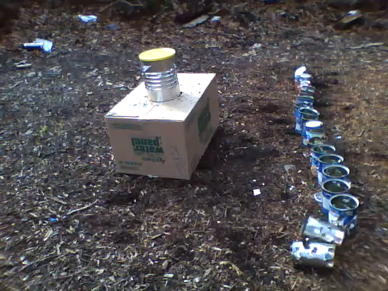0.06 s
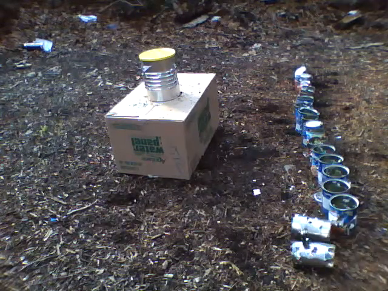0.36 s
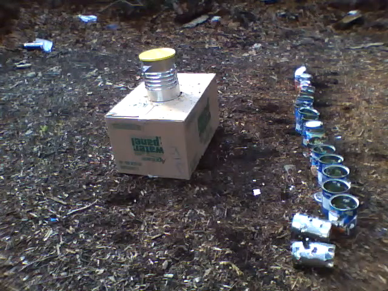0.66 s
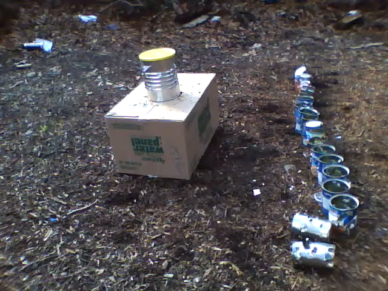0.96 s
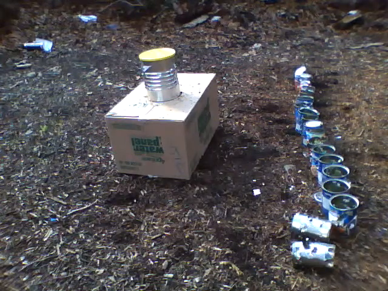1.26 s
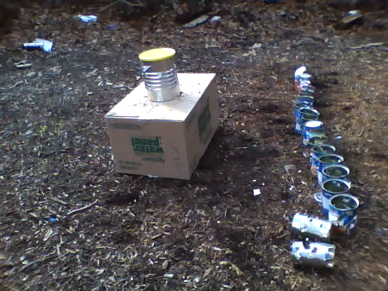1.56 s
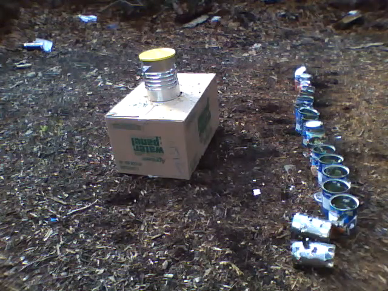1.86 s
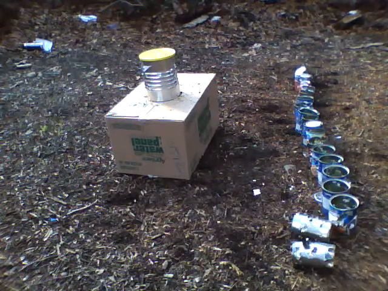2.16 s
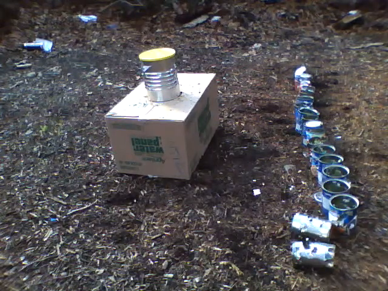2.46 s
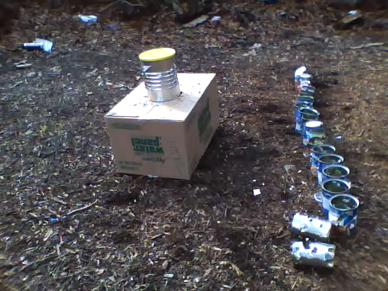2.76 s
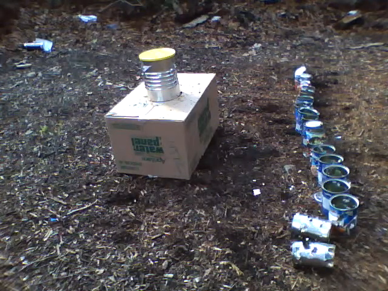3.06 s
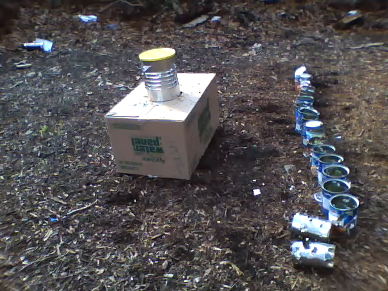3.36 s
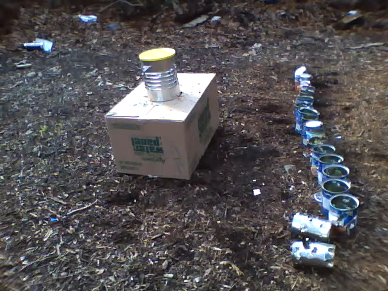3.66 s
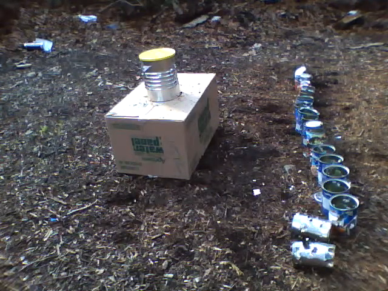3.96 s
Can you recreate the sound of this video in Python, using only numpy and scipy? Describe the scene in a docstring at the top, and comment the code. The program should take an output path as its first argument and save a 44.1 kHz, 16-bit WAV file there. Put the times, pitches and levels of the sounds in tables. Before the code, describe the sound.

A tin can rings and clatters right at the start, knocking hard on another can while the echo of a blow fades among trees. It scuffs over dry leaves and settles with small ticks by about 0.7 seconds. Faint outdoor air, microphone hiss and distant rumble carry on throughout. Near 2.8 seconds a metal catch snaps with one light double click and a short echo.

```python
"""A tin can, struck a moment earlier, tumbles off a row of cans onto leaf litter among trees.
At first its modes ring while the blow dies away in the wood, over faint outdoor air, microphone hiss,
hum and distant rumble that last throughout. It ticks, knocks hard on a neighbour, then scuffs the
ground and settles with more small ticks as the litter shifts. Near 2.8 s a metal catch snaps over
with one light double click, which echoes off the trees."""
import sys
import numpy as np
from scipy import signal
from scipy.fft import rfft, irfft
from scipy.io import wavfile

SR = 44100
rng = np.random.default_rng(int(sys.argv[2]) if len(sys.argv) > 2 else 0)


def transcribe(signal):
    """Save signal, clipped to [-1, 1], as a 16-bit WAV file at the path in sys.argv[1]."""
    frames = np.atleast_2d(signal).T
    limited = np.clip(frames, -1, 1)
    pcm = np.round(limited * 32767).astype(np.int16)
    wavfile.write(sys.argv[1], SR, pcm)


N = 176400
T = np.arange(N) / SR

# modes that the first blow left ringing in the can: pitch_hz, level_db, t60_s
CAN_MODES = [(791, -37.5, .75), (838, -51, .8), (1077, -35.5, .25), (1125, -48, .55), (1453, -39, .14),
             (1620, -41, .3), (2005, -38, .22), (2557, -40, .14), (3585, -39, .1)]
# reverberation of that blow among the trees: frequency_hz, density_db, t60_s
BLOW_REVERB = [(40, -42, .8), (150, -29, 0.62), (533, -31, 0.67), (1340, -23.5, 0.9), (3100, -25.5, 0.64),
               (5050, -32, 0.66), (7000, -35, 0.44), (9900, -41, 0.34), (15500, -45, 0.27)]
# spectral shape of outdoor air and microphone hiss: frequency_hz, relative_density_db
AIR_SPECTRUM = [(15, -44), (25, -8), (53, -2.5), (107, -3.5), (198, -3), (227, -5.5), (253, -4.5),
                (289, -6), (399, -4), (762, -2.5), (1170, -8.5), (1340, -12.5), (3440, -18), (12200, -18),
                (15500, -21)]
# faint hum and electrical whine: centre_hz, level_db, width_hz
HUM_BANDS = [(103, -72, 10), (11950, -81, 16)]
# envelope of the distant rumble: time_s, level_db
RUMBLE_LEVELS = [(0, -69), (1.1, -76), (1.7, -61.5), (2.6, -69), (3.3, -62), (4.1, -66)]
# small contacts with cans, twigs and grit: start_s, level_db, centre_hz, t60_s
TICK_CONTACTS = [(.003, -34, 1330, 0.096), (0.0336, -27, 3440, 0.0089), (0.0816, -21, 2750, 0.0036),
                 (0.0936, -32, 5640, 0.0055), (0.1129, -33, 3300, .02), (0.119, -32.5, 3450, 0.013),
                 (.331, -42, 2820, 0.012), (.376, -36, 3130, 0.021), (.4015, -33, 4360, 0.0097),
                 (.409, -51, 4000, 0.029), (0.5204, -42.5, 1190, 0.015), (.533, -50, 3570, .016),
                 (0.563, -51.5, 3000, 0.029), (0.58, -48, 2560, 0.022)]
# hard knocks of can on can: start_s, gain_db, pitch_ratio, cutoff_hz
KNOCK_CONTACTS = [(0.0682, 5.5, 0.996, 11700), (0.0793, -9.5, 1.1, 3800)]
# heavily damped modes of a knock: pitch_hz, relative_db, t60_s
CLANK_MODES = [(540, -39, .01), (1075, -24, 0.0098), (1510, -9.5, 0.0095), (1725, -9, 0.0068),
               (2420, -17.5, 0.0085), (2970, -19, 0.024), (4060, -23.5, 0.0066), (4810, -21, 0.0079),
               (5480, -23, 0.0082), (7310, -36, 0.0094)]
# scuffs of the can over the litter: start_s, wall_db, litter_db, hold_s, release_t60_s
SCUFF_STROKES = [(0.173, -37.5, -41, 0.0094, 0.082), (0.251, -48.5, -43, 0.014, 0.14),
                 (0.453, -62, -46, 0.011, 0.064)]
# wall modes that the scuffing excites: pitch_hz, relative_db, t60_s
WALL_MODES = [(1114, 2, 0.055), (1780, -7, 0.056), (3025, 4.5, 0.024), (3290, 2, 0.036), (3530, 4, 0.024),
              (4090, -3.5, 0.099), (4780, 4, 0.026), (5080, 2, 0.021), (5900, -4, 0.025),
              (7880, 0.5, 0.024)]
# envelope of the litter shifting as the can beds in: time_s, level_db
SETTLING_LEVELS = [(.28, -55.5), (.40, -61.5), (.47, -56.5), (.60, -64), (.68, -77)]
# contacts within the double click: start_s, drive_db
CATCH_CONTACTS = [(2.8175, -40.5), (2.82, -47.5), (2.8284, -42.5), (2.8318, -52), (2.846, -48)]
# modes of the metal catch: pitch_hz, relative_db, t60_s
CATCH_MODES = [(1820, 0.5, 0.0095), (2480, 0.5, .006), (2910, 3.5, 0.0084), (3260, -1, 0.0089),
               (4040, -1, 0.005), (5200, -4.5, 0.036)]

WOOD_T60_S, WOOD_CUT_HZ, WOOD_BUILD_S, CAN_ECHO_DB = 0.51, 4100, 0.004, -25.5
AIR_DB, RUMBLE_BAND_HZ = -54.5, (49.5, 120)
TICK_Q = 1.8
CRACK_GAIN_DB, CRACK_T60_S = -33.5, 0.0099
GROUND_LAG_S, GROUND_GAIN_DB = 0.001205, -7.5
SCUFF_ATTACK_S, GRAINS_PER_S, LITTER_BAND_HZ = 0.0012, 2600, (1390, 7000)
CRUMBS_PER_S, CRUMB_BAND_HZ = 3000, (121, 2830)
CLICK_T60_S, CLICK_RING_DB, CLICK_SNAP_DB = 0.02, 1.5, -1
CLICK_ECHO_DB, CLICK_ECHO_BAND_HZ = 3, (1500, 3530)
CUTOFF_HZ = 15850


def from_db(db):
    """Amplitude grows tenfold for every 20 dB."""
    return 10 ** (np.asarray(db) / 20)


def unit_rms(x):
    """Normalisation to unit mean power."""
    return x / np.sqrt(np.mean(x ** 2) + 1e-20)


def at_hz(points, hz, column=1):
    """Interpolation of a table column along log frequency."""
    table = np.array(points)
    return np.interp(np.log(np.maximum(hz, 1)), np.log(table[:, 0]), table[:, column])


def filtered(x, hz, kind, order=2):
    """Butterworth filtering, maximally flat in the passband."""
    sections = signal.butter(order, np.clip(hz, 10, .48 * SR), kind, fs=SR, output="sos")
    return signal.sosfilt(sections, x + 1e-18)


def decay(start_s, t60_s, hold_s=0):
    """Exponential decay of 60 dB per t60_s, after a sudden onset and a hold."""
    elapsed_s = np.maximum(T - start_s - hold_s, 0)
    return (T >= start_s) * np.exp(-np.log(1000) * np.minimum(elapsed_s / t60_s, 10))


def level_curve(points):
    """An envelope linear in decibels between its points, silent outside them."""
    time_s, level_db = np.transpose(points)
    return from_db(np.interp(T, time_s, level_db, left=-np.inf, right=-np.inf))


def shot_noise(per_s):
    """Shot noise: independent impulses of random time and size."""
    return rng.standard_normal(N) * (rng.random(N) < per_s / SR)


def ring(drive, modes):
    """Modal superposition: damped resonators of alternating sign share one drive."""
    out = 0
    for k, (hz, db, t60_s) in enumerate(modes):
        radius, angle = np.exp(-np.log(1000) / (t60_s * SR)), 2 * np.pi * hz / SR
        feedback = [1, -2 * radius * np.cos(angle), radius * radius]
        out += (-1) ** k * from_db(db) * signal.lfilter([0, np.sin(angle)], feedback, drive + 1e-18)
    return out


def resonate(drive, modes):
    """Forced vibration: modes colour the drive, and the result is scaled to the drive's energy."""
    return unit_rms(ring(drive, modes)) * np.sqrt(np.mean(drive ** 2))


def first_blow():
    """Free vibration of the struck can, while the wood's reverberation decays, treble first."""
    out = ring(signal.unit_impulse(N), CAN_MODES)
    white = rng.standard_normal((2, N))
    edges_hz = np.geomspace(30, 17000, 19)
    for k, (low, high) in enumerate(zip(edges_hz, edges_hz[1:])):
        hz = np.sqrt(low * high)
        band = filtered(white[k % 2], [low, high], "band") * from_db(at_hz(BLOW_REVERB, hz))
        out += band * decay(0, at_hz(BLOW_REVERB, hz, column=2))
    return out


def air_and_hum():
    """Stationary noise: a broad spectrum is heard as air and hiss, narrow bands as hum and whine."""
    hz = np.arange(N // 2 + 1) * SR / N
    spectra = [(AIR_DB, from_db(at_hz(AIR_SPECTRUM, hz)))]
    for centre_hz, db, width_hz in HUM_BANDS:
        spectra.append((db, 1 / (1 + (2 * (hz - centre_hz) / width_hz) ** 2)))
    out = 0
    for db, shape in spectra:
        noise = irfft(rfft(rng.standard_normal(N)) * shape, N)
        out += from_db(db) * unit_rms(noise)
    return out


def distant_rumble():
    """Slow amplitude modulation makes far-off low noise swell and ebb."""
    return level_curve(RUMBLE_LEVELS) * unit_rms(filtered(rng.standard_normal(N), RUMBLE_BAND_HZ, "band"))


def ticks():
    """Each brief, gritty contact excites one resonance, broad because its Q is low."""
    out = 0
    for start_s, db, hz, t60_s in TICK_CONTACTS:
        grit = rng.standard_normal(N) * decay(start_s, t60_s)
        mode_t60_s = np.log(1000) * TICK_Q / (np.pi * hz)
        out += from_db(db) * resonate(grit, [(hz, 0, mode_t60_s)])
    return out


def tree_echoes(x):
    """Scattering from trunks and ground returns dull echoes that build up and decay."""
    echoes = shot_noise(per_s=3000) * decay(0, WOOD_T60_S) * (1 - np.exp(-T / WOOD_BUILD_S))
    response = filtered(echoes, WOOD_CUT_HZ, "low")
    return signal.fftconvolve(x, response / np.linalg.norm(response))[:N]


def knocks():
    """Impact excites damped modes and a brief crack; the ground reflection interferes with both."""
    direct = 0
    for start_s, db, pitch_ratio, cutoff_hz in KNOCK_CONTACTS:
        crack = from_db(CRACK_GAIN_DB) * rng.standard_normal(N) * decay(start_s, CRACK_T60_S)
        modes = [(hz * pitch_ratio, mode_db, t60_s) for hz, mode_db, t60_s in CLANK_MODES]
        clank = ring(signal.unit_impulse(N, int(start_s * SR)), modes)
        direct += from_db(db) * filtered(clank + crack, cutoff_hz, "low")
    return direct + from_db(GROUND_GAIN_DB) * np.interp(T - GROUND_LAG_S, T, direct)


def scuffs():
    """Friction as many tiny impacts: grains of litter crackle against the can and ring its wall."""
    wall, litter = 0, 0
    grains = unit_rms(shot_noise(GRAINS_PER_S))
    for start_s, wall_db, litter_db, hold_s, t60_s in SCUFF_STROKES:
        attack = np.clip((T - start_s) / SCUFF_ATTACK_S, 0, 1)
        rub = grains * attack * decay(start_s, t60_s, hold_s)
        wall += from_db(wall_db) * rub
        litter += from_db(litter_db) * rub
    return resonate(wall, WALL_MODES) + filtered(litter, LITTER_BAND_HZ, "band", order=1)


def settling():
    """Crumbs of soil and leaf yield under the can; their impulses sum to a dull shot noise."""
    crumbs = filtered(shot_noise(CRUMBS_PER_S), CRUMB_BAND_HZ, "band")
    return level_curve(SETTLING_LEVELS) * unit_rms(crumbs)


def double_click():
    """Transient excitation: a metal catch snaps over and rings; the trees scatter its middle band."""
    envelope = sum(from_db(db) * decay(start_s, CLICK_T60_S) for start_s, db in CATCH_CONTACTS)
    drive = rng.standard_normal(N) * envelope
    snap = from_db(CLICK_SNAP_DB) * filtered(drive, hz=9500, kind="low")
    ringing = from_db(CLICK_RING_DB) * resonate(drive, CATCH_MODES)
    echo = from_db(CLICK_ECHO_DB) * tree_echoes(filtered(drive, CLICK_ECHO_BAND_HZ, "band"))
    return filtered(ringing + snap, hz=1340, kind="high") + echo


def scene():
    """Superposition: the sources add, and two equal channels place them in the centre."""
    tumble = knocks() + ticks() + scuffs() + settling()
    can = first_blow() + tumble + from_db(CAN_ECHO_DB) * tree_echoes(tumble)
    mono = can + double_click() + air_and_hum() + distant_rumble()
    return np.array([mono, mono])


def record(dry):
    """Band limiting: an elliptic low-pass filter cuts the highest treble steeply."""
    return signal.sosfilt(signal.ellip(12, .1, 80, CUTOFF_HZ, fs=SR, output="sos"), dry)


dry = scene()
out = record(dry)
transcribe(out)
```